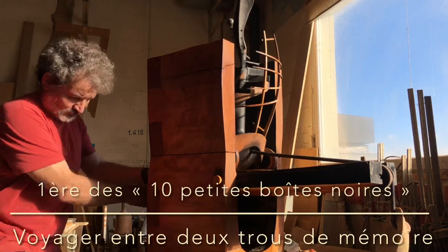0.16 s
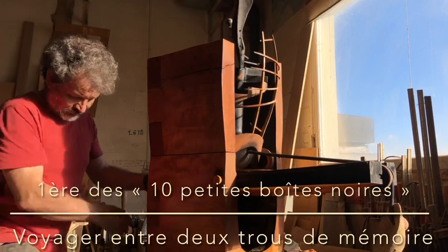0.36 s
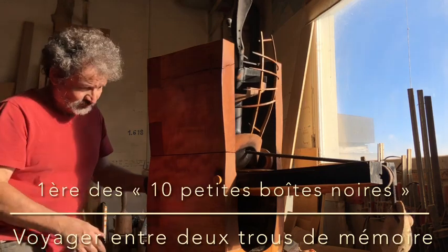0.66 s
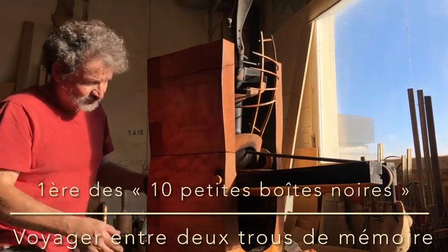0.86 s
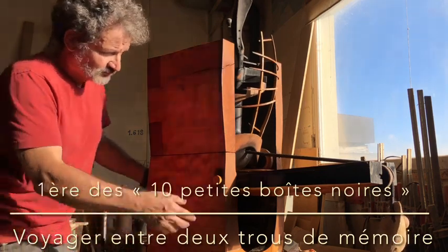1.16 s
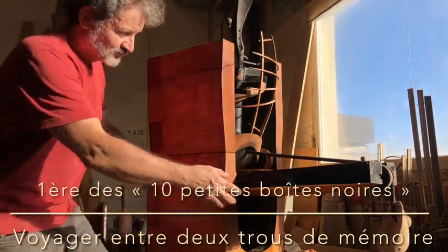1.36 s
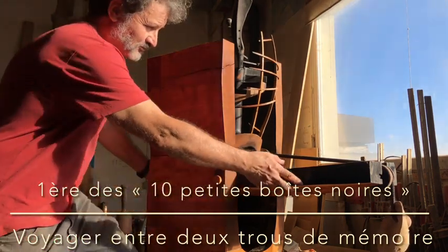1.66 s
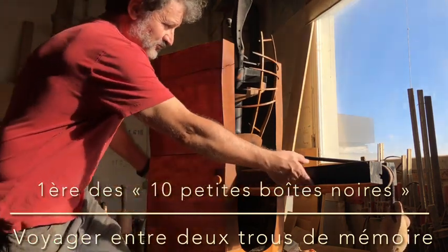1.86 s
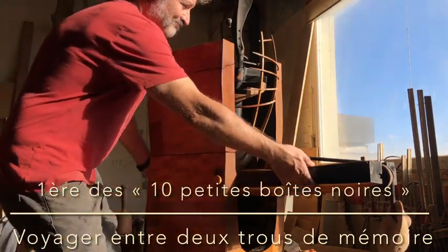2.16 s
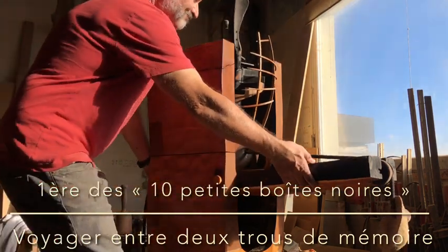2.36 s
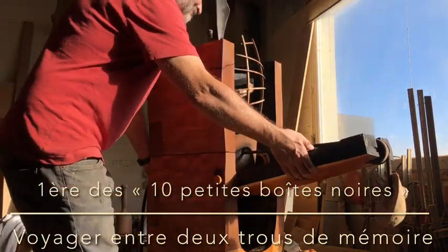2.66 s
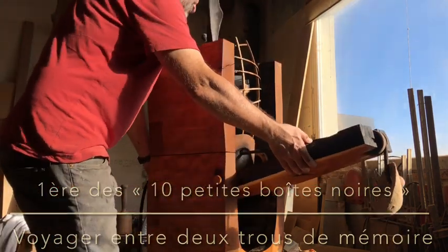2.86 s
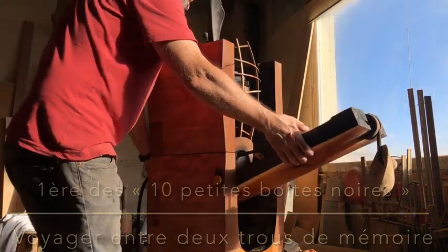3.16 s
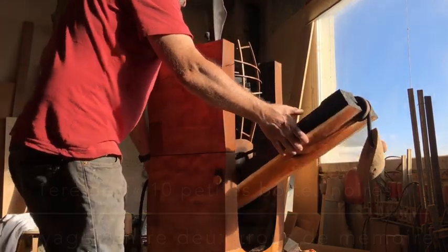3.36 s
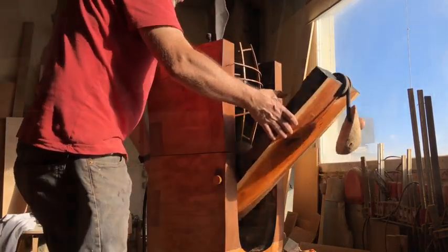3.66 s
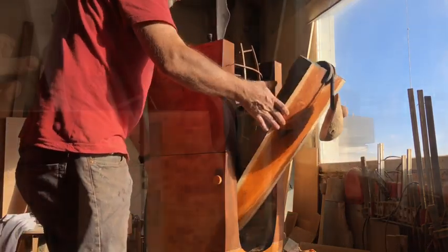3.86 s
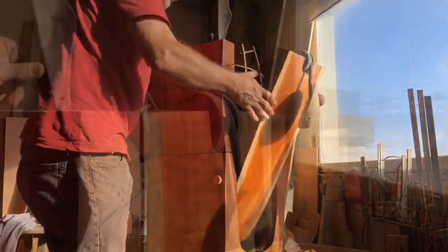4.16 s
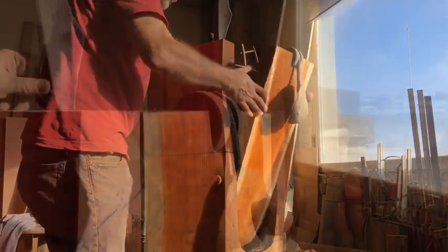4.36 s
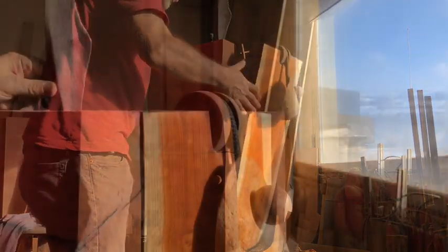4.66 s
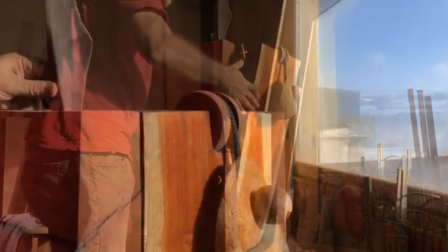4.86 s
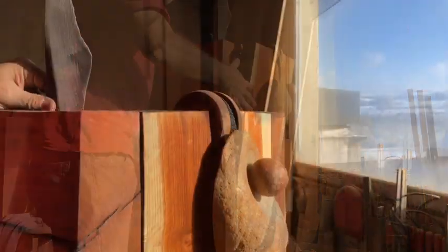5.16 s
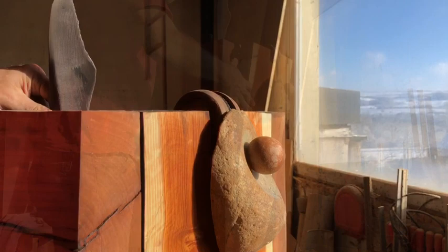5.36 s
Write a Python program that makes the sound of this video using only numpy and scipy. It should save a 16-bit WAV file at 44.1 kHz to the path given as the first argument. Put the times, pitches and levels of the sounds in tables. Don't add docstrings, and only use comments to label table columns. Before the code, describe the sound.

A close microphone hears a wooden box being handled in a small, briefly reverberant workshop over a quiet low hum. Sleeves brush and a faint tap comes at 0.2 s. At 0.74-0.85 s a drawer scrapes and lands with a loud, hollow cluster of knocks, shuddering away; small ticks follow near 1.04 s. After a lull with soft dusty rubbing, a sharp woody knock booms at 1.72 s. Light clacks and sliding at 2.03 s lead to a crisp knock with a tiny metallic rattle at 2.26 s, then a dense rough clatter at 2.39-2.47 s. Small taps precede a hard, bright clack at 2.97 s. A soft knock at 3.35 s and faint bumps follow. The flap thuds low and round at 4.35 s with a very thin high squeak, knocks lightly at 4.7 s, then groans in short low heaves with muffled rubbing and bumps from 5.0 s to the end.

```python
import sys
import numpy as np
from scipy import signal
from scipy.io import wavfile
from scipy.ndimage import uniform_filter1d

SR = 44100
rng = np.random.default_rng(int(sys.argv[2]) if len(sys.argv) > 2 else 0)


def nominal_scale(level):
    x = np.asarray(level, float) / 20
    return 10 ** x


def digitize_waveform(pressure):
    field = np.atleast_2d(pressure).T
    bounded = np.clip(field, -1, 1)
    quanta = np.round(bounded * 32767).astype(np.int16)
    wavfile.write(sys.argv[1], SR, quanta)


N = 243431

BANDS_HZ = 30 * 2 ** np.arange(0, 9.1, .5)
# frequency in Hz, level in dB per Hz.
HUM_SPECTRUM = [(15, -40), (25, -8.5), (87, -1), (153, -5.5), (200, 3.5), (249, -5.5), (384, -5.5),
                (439, -13.5), (607, -13), (1290, -21.5), (8140, -31), (14800, -36.5), (16000, -25.5)]
HUM_DB = -66.5
# time in seconds, level in
# dB.
BACKGROUND_LEVEL = [(0, 2), (.56, 2.5), (.62, -0.5), (.73, -1.5), (1.0, 3), (3.5, 0.23), (4.6, -2), (5.52, 4)]
# frequency in Hz, t60 in seconds.
ROOM_T60 = [(60, 0.75), (200, 0.813), (500, 0.453), (1200, 0.318), (3000, 0.396), (6000, 0.333),
            (14000, 0.14)]
# frequency in Hz, level in dB re direct.
ROOM_DB = [(60, -13.5), (200, 2), (500, 0), (1200, -2), (3000, -8), (6000, -4.5), (14000, -33.5)]

# frequency in Hz, level in dB, t60 in seconds.
PANELS = [(84.7, -17.5, 0.18), (114.5, -13.5, 0.19), (143.5, -7.5, 0.1405), (179.53, -1, 0.0777),
          (240, -2.5, 0.078), (270.7, -4, 0.078), (345.7, -1.5, 0.0583), (396.97, -4, 0.0824),
          (454.2, 2, 0.0725), (508.4, -3, 0.0507), (582.25, 0, 0.088), (620, -8, 0.0725),
          (733.7, -4, 0.0547), (782.8, -6.5, 0.045), (876.5, -11, 0.067), (930, -10.5, 0.027)]
# frequency in Hz, level in dB, t60 in seconds.
RAILS = [(933, 4, 0.0159), (1194, 1, 0.0224), (1350, -1, 0.0219), (1500, -5, 0.0628), (1814, -0.5, 0.0227),
         (2200, -2.5, 0.018), (2354, -2.5, 0.0135), (2941, -1.5, 0.01845), (3350, 0, 0.0105),
         (3675, -2, 0.01073), (4405, 0, 0.00426), (5120, -1, 0.0051), (6575, 0.5, 0.00537),
         (8000, -35, 0.0046)]
# frequency in Hz, level in dB, t60 in seconds.
CATCH_MODES = [(984, 6.5, 0.051), (1444, 1, 0.056), (1950, 3, 0.029), (2157, 1, 0.065), (3324, -1.5, 0.072),
               (4247, -2, 0.045), (4350, -9, 0.052), (5440, -7, 0.075), (5490, -8.5, 0.047),
               (6560, -13.5, .04)]

# start in seconds, rise and fall in s per 20 dB,
# hold in seconds, level in dB.
SCUFFS = [(0, .2, 0.137, -77), (0.191, 0.24, 0.0436, -71.5), (0.297, 0.18, 0.194, -79),
          (1.15, -0.13, 0.334, -82), (4.246, -0.16, 0.174, -81), (5.061, -0.02, 0.141, -74),
          (5.303, -0.38, 0.248, -74)]
# time in seconds, level in dB.
STEPS = [(0, -66.5), (.28, -68.5), (.85, -58), (1.79, -57), (2.1, -66), (2.469, -48), (3.03, -54),
         (3.4, -64), (3.8, -70.5), (4.4, -72), (4.73, -71.5), (5.2, -71), (5.45, -81.5)]
# fastest moment in seconds, rise and fall in s per 20 dB,
# rumble in dB, dust in dB re rumble.
SLIDES = [(.194, -0.01, 0.34, -61.5, -18.5), (.03, 4, 0.1, -68.5, -5), (.3, 1, 1, -70.5, -1),
          (.57, 4, 0.5, -71, -23), (0.759, 0.0109, -0.02, -47.5, -15),
          (0.786, 0.0395, -0.0218, -36.5, -54.5), (1.036, 0.12, -0.06, -66.5, -1.5),
          (1.09, .02, .03, -63, -26.5), (1.15, 0.2, 0.6, -73, 4.5), (1.27, .04, .2, -63, -26.5),
          (1.52, 0.18, 1.26, -72.5, 3), (1.68, 0.1315, 0.0919, -53.5, -6.5),
          (2.025, 0.0584, 0.13, -53.5, -4.5), (2.046, 0.04, -0.1627, -49, -32.5),
          (2.12, 0.1, .5, -61.5, -9), (2.45, 0.0612, 0.1217, -33, -56), (2.44, 0.1219, 0.06, -53.5, -10),
          (2.5, 0.0714, 0.1976, -44, -41.5), (1.645, 0.14, -0.29, -56, -27),
          (2.075, 0.19, -0.1, -54.5, -32.5), (3.63, -0.54, -0.37, -73.5, -10),
          (3.65, 0.74, 0.0959, -63, -16), (4.166, 0.69, 1.4, -65.5, -32.5), (4.3, 0.03, 0.3, -63.5, -12),
          (4.91, -0.05, .2, -68, -32.5), (5.096, 0.06, 15, -65, -15.5)]
# start in seconds, fall in s per 20 dB,
# rumble in dB, rasp and dust in dB re rumble.
JUDDERS = [(.008, 0.092, -71.5, 5, -8), (.741, 0.0854, -48.5, -3.5, -12.5), (.8, 0.11, -41.5, -15.5, -28.5),
           (0.847, 0.0173, -35.5, -36.5, -45.5), (.875, 0.262, -45.5, -15, -25.5),
           (1.761, 0.175, -45.5, -15.5, -37.5), (2.28, 0.0193, -41.5, -21.5, -31.5),
           (2.31, 0.45, -61, -8, -14.5), (2.393, 0.11, -39, -12.5, -13.5), (2.55, 0.283, -51.5, -25, -26.5),
           (2.878, 0.037, -50.5, -11, -28.5), (2.9, 0.154, -62.5, -7.5, -15), (2.97, 0.06, -42.5, -2, -22),
           (3.005, 0.1415, -44.5, -9.5, -50.5), (3.08, 0.194, -62.5, -5, -22.5),
           (3.362, 0.175, -55.5, -15, -26.5), (4.698, 0.051, -54.5, -13.5, -16)]
# start in seconds, hold in seconds, pitch in Hz, level in dB.
CHIRPS = [
    (.166, .03, 12970, -81.5),
    (1.258, .02, 9430, -83),
    (4.25, .02, 10980, -85),
    (4.57, .06, 10070, -99),
]
# start in seconds, peak in dB, crack and rail reference pitch in Hz, tick in dB re
CLACKS = [(0.1852, -55.5, 1350, -21.5), (0.1989, -55.5, 1300, -27.5), (0.7361, -52, 2000, -8.5),
          (0.752, -45, 1410, -1.5), (0.7595, -50.5, 1020, 8), (0.7909, -39.5, 964, -13),
          (0.876, -48.5, 1160, -25.5), (1.0255, -52, 1190, 1.5), (1.045, -55.5, 1500, 6),
          (1.7181, -31, 1308, -20), (2.0348, -49.5, 1450, -8), (2.0483, -54, 1500, -11.5),
          (2.1741, -59.5, 1900, 6.5), (2.259, -43.5, 2220, 0), (2.388, -44, 1140, -2),
          (2.4176, -39.5, 1120, -25), (2.4297, -39.5, 990, -24.5), (2.872, -55.5, 1400, -23.5),
          (2.929, -66, 1380, 1.5), (2.9653, -34.5, 1627, -17), (2.9745, -35, 1560, -26),
          (2.9833, -39, 1500, -31), (3.3521, -59.5, 1400, -22.5), (3.6177, -74, 1150, -15),
          (4.351, -67, 930, -4), (4.5083, -79.5, 1080, 10.5), (4.6931, -61, 3250, -15.5),
          (4.949, -58.5, 1920, -17)]
# start in seconds, peak in dB, centre in Hz, decay in seconds.
SNAPS = [(0.185, -60.5, 1500, 0.0052), (0.7344, -54.5, 2500, 0.0113), (.753, -56.5, 9000, 0.00216),
         (.7602, -34, 12500, .001), (.773, -55, 10000, .002), (0.7913, -52, 7000, 0.00144),
         (0.8751, -60, 4000, 0.0034), (1.044, -50.5, 11000, 0.00143), (2.0172, -50, 9000, 0.0022),
         (2.031, -50, 9000, 0.0021), (2.049, -51.5, 10000, 0.00195), (2.259, -44, 5500, .0014),
         (2.2592, -41, 13000, 0.0011), (2.3883, -45, 1600, 0.0041), (2.394, -42.5, 5000, 0.0039),
         (2.404, -44.5, 4000, 0.0036), (2.417, -40.5, 1390, 0.00316), (2.4276, -45.5, 3500, 0.0053),
         (2.437, -50, 1800, 0.0022), (2.452, -45, 2200, 0.0033), (2.474, -53.5, 1500, 0.0032),
         (2.606, -62.5, 693, 0.0049), (2.724, -56.5, 750, 0.0048), (2.9664, -47.5, 3000, 0.0033),
         (4.9483, -64.5, 4300, 0.003), (2.966, -44, 3200, .006), (2.977, -50, 2800, .008),
         (2.99, -52, 2200, 0.0225), (4.509, -56, 13000, .001), (4.694, -67, 6000, 0.0021),
         (2.86, -63, 900, .004), (4.709, -63, 1500, 0.0037), (4.713, -69, 3010, 0.0029)]
# start in seconds, frequency in Hz, peak in dB, t60 in seconds.
PINGS = [(.187, 1348, -60, .04), (.19, 1120, -58.5, 0.045), (.195, 1522, -62, 0.052),
         (.741, 192.4, -45.5, 0.076), (.7915, 815.5, -34.5, 0.052), (.792, 1280, -52, 0.038),
         (.794, 2060, -49.5, 0.029), (.794, 1500, -48.5, 0.054), (.845, 730.5, -45, 0.123),
         (.92, 479.6, -44.5, 0.146), (.89, 800, -51.5, 0.068), (.797, 240, -38, 0.088),
         (.82, 1192, -48.5, 0.137), (.795, 710, -42, 0.101), (.82, 607.8, -36.5, 0.143),
         (1.718, 3347, -35.5, 0.0097), (1.72, 1152, -37.5, 0.05), (1.73, 740.6, -42.5, 0.203),
         (1.77, 1191, -57, 0.178), (2.048, 1507, -54, 0.068), (2.048, 3033, -64.5, 0.059),
         (2.048, 3546, -61, 0.078), (2.048, 2435, -57, 0.051), (2.05, 721.7, -49.5, 0.103),
         (2.27, 227.8, -49.5, 0.118), (2.418, 1114, -38, 0.0177), (2.42, 532, -32, 0.0116),
         (2.433, 1500, -50, 0.0144), (2.44, 597.4, -32.5, 0.16), (2.45, 268, -34, 0.122),
         (2.452, 458, -30.5, 0.045), (2.464, 329, -38, 0.032), (2.606, 620, -49, 0.055),
         (2.724, 661, -62, 0.047), (2.876, 1380, -55.5, 0.066), (2.876, 1787, -64.5, 0.072),
         (2.874, 2948, -62.5, 0.065), (2.874, 3316, -66.5, 0.049), (2.88, 394.4, -50, 0.078),
         (2.93, 1390, -61, 0.031), (2.967, 3550, -43.5, 0.031), (2.967, 2860, -44, 0.038),
         (2.967, 6790, -52, 0.0264), (2.978, 7060, -58.5, 0.054), (2.97, 590.3, -43.5, 0.095),
         (2.975, 1361, -43, 0.106), (2.98, 951.8, -46, 0.148), (2.98, 1881, -52.5, 0.113),
         (2.98, 2707, -53.5, 0.134), (2.97, 235.9, -41, 0.17)]
# start in seconds,
# frequency in Hz, peak in dB, # t60 in seconds.
MORE_PINGS = [(3.345, 191.8, -46, 0.229), (3.358, 478, -49, 0.165), (3.36, 504.6, -53.5, 0.113),
              (3.365, 1405, -60, 0.067), (3.352, 1684, -67.5, .03), (3.365, 1005, -68, 0.049),
              (4.35, 191, -39.5, 0.29), (4.352, 530, -48.5, 0.16), (4.352, 500.6, -47, 0.153),
              (4.43, 159.7, -50.5, 0.214), (4.52, 184.3, -51, 0.246), (4.895, 333, -60, 0.067),
              (4.9, 518, -62, 0.128), (4.35, 421, -42.5, 0.0803), (4.39, 372.6, -53, 0.29),
              (4.41, 271, -57.5, .2), (4.695, 527.4, -53, 0.043), (4.715, 561, -55, 0.086),
              (4.768, 477, -54.5, 0.054), (5.458, 405, -58, 0.041), (4.694, 3102, -61, 0.0307),
              (4.72, 2987, -75, 0.18), (4.42, 528.7, -52.5, .2), (4.5, 359.5, -59, 0.302),
              (4.152, 211.9, -58, 0.062), (4.949, 2100, -64, .03), (.767, 300, -42, .08),
              (.778, 230, -40, .06), (2.39, 1150, -45, .03), (2.723, 860, -56, .025), (1.74, 800, -46, .15),
              (.186, 900, -60, .05), (4.19, 161, -56.5, 0.056), (4.7, 474, -52.5, 0.138),
              (4.893, 560.3, -66, 0.034)]
# start in seconds, peak in dB, loudest panel in Hz, focus in dB per octave.
THUMPS = [(.224, -50.5, 195, 13.5), (.74, -37.5, 251, 13.5), (.763, -37.5, 144.6, 17.5),
          (.79, -23.5, 359, 8.5), (.802, -25, 270, 4), (.837, -28.5, 435, 5.5), (1.635, -48, 369, 12),
          (1.717, -27.5, 268, 7), (1.779, -35.5, 240, 25.5), (2.034, -41.5, 232, 5.5),
          (2.049, -45, 270, 8.5), (2.259, -34, 376.5, 12.5), (2.392, -35, 500, 3), (2.419, -28, 549, -1.5),
          (2.432, -25.5, 520, 4), (2.446, -29.5, 587, 3.5), (2.473, -31.5, 443, 19),
          (2.605, -52.5, 557, 9.5), (2.723, -51.5, 603, 2), (2.965, -34.5, 437, 27.5),
          (2.971, -30, 251, 2.5)]
# start in seconds, peak in dB, loudest panel in Hz, focus in dB per octave.
BUMPS = [(3.357, -53.5, 476, 12), (3.679, -53.5, 184.6, 19.5), (3.799, -52.5, 201.5, 17),
         (4.345, -31, 192.3, 9.5), (4.364, -39, 201, 7.5), (4.429, -46.5, 262, 3), (4.695, -46, 140, 5.5),
         (4.893, -58, 520, 4), (5.026, -54, 156.3, 16.5), (5.105, -49.5, 152, 11), (5.194, -54, 140, 10),
         (5.456, -48, 166.1, 10)]
# time in seconds, level in dB.
BOUNCES = [
    (2.2609, -59.5),
    (2.271, -59),
    (2.283, -68),
    (2.295, -65.5),
    (2.311, -67),
]
# start in seconds, hold in seconds, pitch in Hz, level in dB.
CREAKS = [
    (2.89, 0.0292, 588, -55.5),
]
# time in seconds, pitch in Hz, level in dB.
SQUEAK = [(4.17, 9500, -90), (4.202, 10600, -86.5), (4.232, 13220, -79.5), (4.252, 14500, -74),
          (4.268, 14359, -81.5), (4.298, 13320, -81), (4.366, 12520, -85), (4.412, 12790, -81),
          (4.49, 10890, -86)]
# start in seconds, hold in seconds, pitch in Hz, level in dB.
GROANS = [(4.24, 0.022, 142.3, -65), (4.275, 0.0195, 134.6, -61), (4.322, 0.0107, 150.5, -63),
          (4.704, 0.0332, 127.2, -53), (4.765, 0.013, 146.5, -65), (5.04, 0.006, 154.6, -63),
          (5.107, 0.0092, 154.7, -57.5), (5.142, 0.0151, 138.2, -57.5), (5.197, 0.0205, 136, -53.5),
          (5.265, 0.0142, 160.4, -64.5), (5.305, 0.02999, 132.4, -59.5), (5.355, 0.0097, 165.8, -60.5),
          (5.402, 0.0288, 134.3, -54.5), (5.46, 0.0135, 166.1, -55), (5.5, 0.0186, 139, -62.5)]
# start in seconds, hold in seconds, level in dB.
PIN_TURNS = [
    (4.288, 0.171, -81.5),
    (5.149, 0.098, -75.5),
    (5.362, 0.1426, -76),
]
# start in seconds, hold in seconds, level in dB.
RUBS = [(5.028, 0.0175, -73.5), (5.099, 0.027, -63), (5.16, 0.056, -63), (5.253, 0.124, -66),
        (5.405, 0.038, -67.5), (5.476, 0.039, -59)]


def unit(x):
    return x / np.sqrt(np.mean(x ** 2))


def at(table, hz):
    table_hz, value = np.transpose(table)
    return np.interp(np.log(hz), np.log(table_hz), value)


def band(x, lo_hz, hi_hz, order=2):
    return signal.sosfilt(signal.butter(order, [lo_hz, min(hi_hz, .45 * SR)], "band", fs=SR, output="sos"), x)


def band_noise(length, hz):
    return unit(band(rng.standard_normal(length), hz / 2 ** .25, hz * 2 ** .25))


def walk(rate):
    k = int(SR / rate)
    steps = np.repeat(rng.standard_normal(N // k + 1), k)
    return 1.273 * uniform_filter1d(uniform_filter1d(steps, k), k)[:N]


def add(out, s, y):
    out[int(s * SR):int(s * SR) + len(y)] += y


def swells(rows):
    t = np.arange(0, N, 32) / SR
    s, rise, hold, fall, db = np.transpose(rows)[:, :, None]
    before = np.maximum(s - t, 0) / np.abs(rise)
    after = np.maximum(t - s - hold, 0) / np.abs(fall)
    level = np.sqrt(np.sum(nominal_scale(db - 20 * (before + after)) ** 2, axis=0))
    return np.interp(np.arange(N) / SR, t, level)


def heaves(rows, edges, slack):
    rise, fall = edges
    load = swells([(s, rise, hold, fall, 0) for s, hold, hz, db in rows])
    level = swells([(s, rise, hold, fall, db) for s, hold, hz, db in rows])
    s, hold, hz, _ = np.transpose(rows)
    pitch = np.interp(np.arange(N) / SR, np.ravel([s, s + hold], "F"), np.repeat(hz, 2))
    return pitch * (1 + slack * (1 - np.minimum(load, 1))), level


def whine(hz, gain, wobble, flutter_db, third_db):
    phase = 2 * np.pi * np.cumsum(hz * (1 + wobble * walk(70))) / SR
    tone = np.sin(phase) + nominal_scale(third_db) * np.sin(3 * phase)
    return np.sqrt(2) * gain * nominal_scale(flutter_db * walk(45)) * tone


def slips(rate, spread_db):
    clicks = rng.random(N) < rate / SR
    size = nominal_scale(spread_db * np.minimum(rng.exponential(size=N), 3.5))
    return unit(clicks * size * rng.choice([-1, 1], N))


def ring(modes, extra_db, detune, damp):
    hz, db, t60 = np.transpose(modes)[:, :, None]
    t = np.arange(SR // 3) / SR
    sign = (-1) ** (np.arange(len(hz))[:, None] // 2)
    decay = np.exp(-np.log(1000) * t * damp / t60)
    return np.sum(sign * nominal_scale(db + extra_db) * decay * np.sin(2 * np.pi * hz * detune * t), axis=0)


def blow(modes, hz, focus_db, damp, scatter_db):
    chance = rng.standard_normal((2, len(modes), 1))
    near_db = -focus_db * np.abs(np.log2(np.array(modes)[:, :1] / hz))
    y = ring(modes, near_db + scatter_db * chance[0], 1 + 0.0223 * chance[1], damp)
    return y / np.max(np.abs(y))


def hum():
    out, swell = 0, walk(1.51)
    for hz in BANDS_HZ:
        noise = band_noise(N, hz) * np.sqrt(hz)
        sway_db = (1.11 * swell + 2.0 * walk(6.13)) * min(1, 600 / hz)
        out = out + nominal_scale(at(HUM_SPECTRUM, hz) + sway_db) * noise
    return unit(out) * nominal_scale(HUM_DB + np.interp(np.arange(N) / SR, *np.transpose(BACKGROUND_LEVEL)))


def rustle():
    level = swells([(s, edge, hold, edge, db) for s, edge, hold, db in SCUFFS])
    return level * unit(band(slips(5000, 2.2), 850, 2215))


def boards():
    give, settle = 0.136, 0.2854
    level = swells([(s, give, 0, settle, db) for s, db in STEPS])
    return level * unit(band(rng.standard_normal(N), 45, 134.3, order=3))


def rubbing():
    jerk = 0.00825
    moves = [(s, rise, fall, db, -5.5 + 0.355 * dust_db, dust_db) for s, rise, fall, db, dust_db in SLIDES]
    moves += [(row[0], jerk, *row[1:]) for row in JUDDERS]
    low = swells([(s, rise, 0, fall, db) for s, rise, fall, db, _, _ in moves])
    mid = swells([(s, rise, 0, fall, db + rasp_db) for s, rise, fall, db, rasp_db, _ in moves])
    high = swells([(s, rise, 0, fall, db + dust_db) for s, rise, fall, db, _, dust_db in moves])
    shaken_panels = signal.fftconvolve(slips(700, 3.19), ring(PANELS, 0, 0.9943, 1.875))[:N]
    shaken_rails = signal.fftconvolve(slips(2500, 1.94), ring(RAILS, 0, 0.9317, 3.76))[:N]
    rumble = unit(band(shaken_panels, 99, 1300))
    rasp = unit(band(shaken_rails, 705, 5630))
    hiss = unit(band(slips(12000, 2.3), 2200, 14500))
    return (nominal_scale(-6.5) * low * rumble + nominal_scale(-2.5 + 2.0 * walk(40.014)) * mid * rasp
            + nominal_scale(-3.0 + 1.43 * walk(60.35)) * high * hiss)


def chirps():
    return whine(*heaves(CHIRPS, (.02, .03), -.02), .004, 3.5, -99)


def clacks():
    out = np.zeros(N + SR)
    t = np.arange(SR // 3) / SR
    damp = 0.982
    for s, db, hz, tick_db in CLACKS:
        grit = rng.standard_normal((2, len(t)))
        crack = band(grit[0] * np.exp(-t * damp / 0.0045), hz / 3.64, hz * 2.215, order=3)
        tick = band(grit[1] * np.exp(-t / 0.0038), 2700, 21000)
        rails = blow(RAILS, hz, -3.5 - 0.196 * tick_db, damp, 0.85)
        add(out, s, nominal_scale(db) * (nominal_scale(-6.5) * rails + nominal_scale(2.5) * crack + nominal_scale(tick_db - 7.0) * tick))
    return band(out[:N], 400, 16000)


def snaps():
    out = np.zeros(N + SR)
    t = np.arange(SR // 20) / SR
    for s, db, hz, decay in SNAPS:
        grit = rng.standard_normal(len(t))
        y = band(grit * np.exp(-t / decay), hz / 2.07, hz * 1.555)
        add(out, s, nominal_scale(db) * y / np.max(np.abs(y)))
    return out[:N]


def pings():
    out = np.zeros(N + SR)
    for s, hz, db, t60 in list(PINGS) + list(MORE_PINGS):
        y = ring([(hz, db, t60), (hz * 1.035, db - 8, t60)], 0, 0.9856, 0.707)
        build = 1 - np.exp(-np.arange(len(y)) / SR * hz / 1.524)
        add(out, s, y * build)
    return out[:N]


def thumps():
    out = np.zeros(N + SR)
    push = np.hanning(int(0.000836 * SR) + 3)
    t = np.arange(SR // 10) / SR
    for s, db, hz, focus_db in list(THUMPS) + list(BUMPS):
        boom = np.convolve(blow(PANELS, hz, focus_db, 1, 1.52), push / push.sum())
        spread = 1 - 0.474 * np.exp(-np.arange(len(boom)) / (0.0037 * SR))
        add(out, s - .0012, nominal_scale(db + 0.7557) * boom * spread)
        bloom = band(rng.standard_normal(len(t)) * np.exp(-t / 0.017), 611, 1270)
        add(out, s + 0.00097, nominal_scale(db - 7.5 - 0.824 * focus_db) * bloom)
    return band(out[:N], 95, 2000)


def catch():
    out = np.zeros(N + SR)
    for s, db in BOUNCES:
        chance = rng.standard_normal((2, len(CATCH_MODES), 1))
        add(out, s, ring(CATCH_MODES, db + 1.8 * chance[0], 1 + 0.0102 * chance[1], 0.884))
    return out[:N]


def creaks():
    return whine(*heaves(CREAKS, (.045, .02), 0.046), 0.0062, 1.3, -28)


def squeak():
    t = np.arange(N) / SR
    s, hz, db = np.transpose(SQUEAK)
    gate = uniform_filter1d(1. * ((t > s[0]) & (t < s[-1])), int(0.019 * SR))
    return whine(np.interp(t, s, hz), gate * nominal_scale(np.interp(t, s, db)), .003, 3.25, -99)


def groans():
    return whine(*heaves(GROANS, (.025, .02), .04), 0.0192, 2.5, -16.5)


def pin():
    level = swells([(s, .2, hold, .1, db - 5) for s, hold, db in PIN_TURNS])
    return level * unit(band(rng.standard_normal(N), 3620, 3900))


def rub():
    level = swells([(s, .05, hold, .06, db) for s, hold, db in RUBS])
    return level * unit(band(rng.standard_normal(N), 408.4, 474))


def room(x):
    t = np.arange(SR) / SR
    tail = 0
    for hz in BANDS_HZ:
        fall = np.log(1000) / at(ROOM_T60, hz)
        noise = band_noise(SR, hz) * np.sqrt(hz * .7 * fall) / SR
        build = 1 - np.exp(-t / (0.00068 + 0.87 / hz))
        tail = tail + nominal_scale(at(ROOM_DB, hz)) * noise * np.exp(-fall * t) * build
    return signal.fftconvolve(x, tail * np.sqrt(2))[:N]


def scene():
    box = thumps() + clacks() + rubbing()
    tones = groans() + creaks() + pings()
    echoes = room(box + nominal_scale(-11) * tones)
    hinge = (squeak() + chirps()) * nominal_scale(5.0 * walk(700))
    small_parts = pin() + rub() + catch() + snaps()
    background = hum() + boards() + rustle()
    return (box + tones + echoes + hinge + small_parts + background)[None]


def low_pass(x):
    return signal.sosfilt(signal.butter(12, 16580, fs=SR, output="sos"), x)


def record(dry):
    top_cut = signal.ellip(8, .2, 28, 15850, fs=SR, output="sos")
    return low_pass(signal.sosfilt(top_cut, dry))


dry = scene()
out = record(dry)
digitize_waveform(out)
```